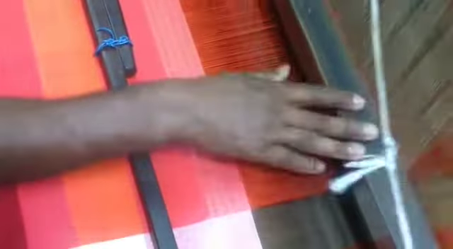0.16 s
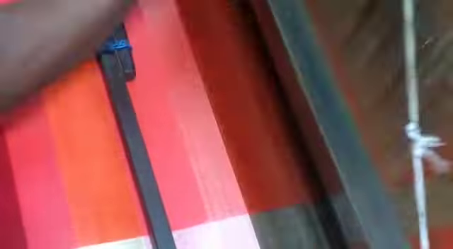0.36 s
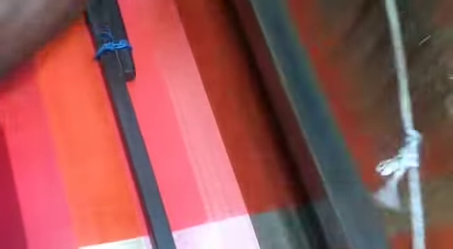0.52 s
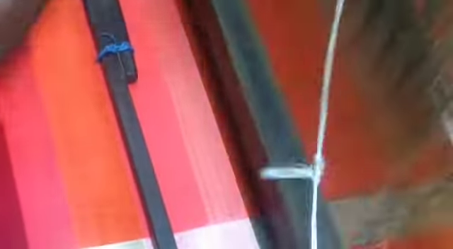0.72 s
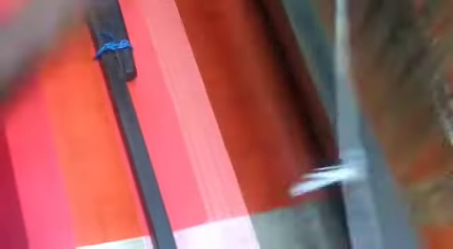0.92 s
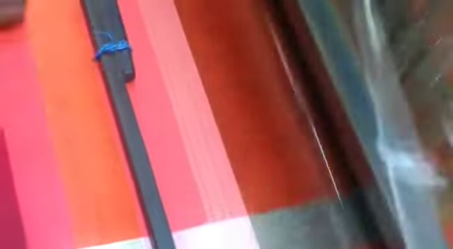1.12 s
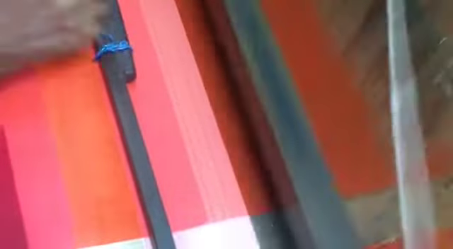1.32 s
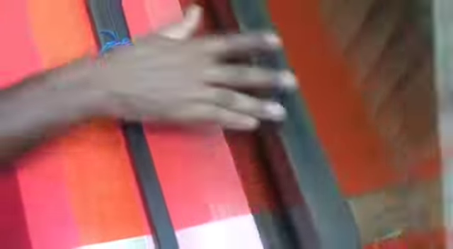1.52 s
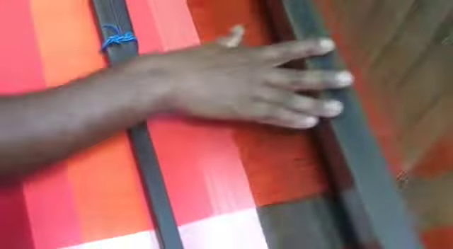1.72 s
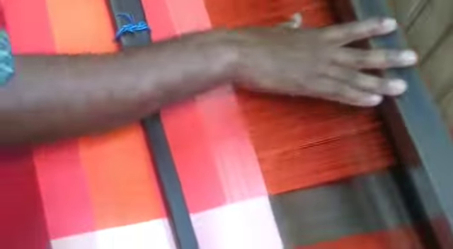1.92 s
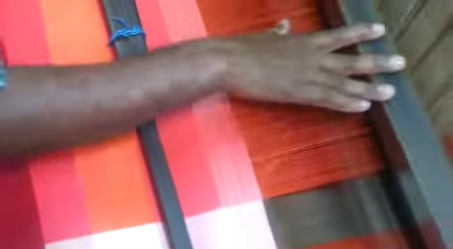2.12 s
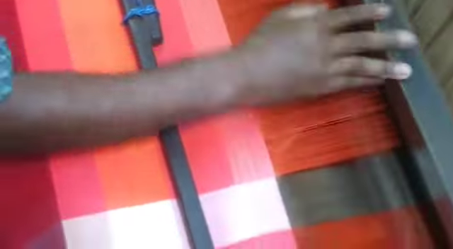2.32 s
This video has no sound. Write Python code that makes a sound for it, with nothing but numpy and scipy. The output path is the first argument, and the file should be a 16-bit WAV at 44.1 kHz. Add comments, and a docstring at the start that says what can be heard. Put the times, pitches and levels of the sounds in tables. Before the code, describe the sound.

A wooden handloom works close by. A dry, hissing reed scrape with faint squeaks swells from 0.1 s to a hard double clack near 0.4 s. Woody knocks rattle around 0.6, 1.0 and 1.25 s. A very brief scrape meets another clack at 1.5 s; a rough, uneven, squeaky scrape runs from 1.65 to 2.1 s, then faint ticks. Soft air noise, short room echo, wide phone-like pickup.

```python
"""Wooden handloom in a workshop.

Beater and shuttle knock in loose clusters: bursts of contacts ring frame modes under a dry crack.
The reed scrapes the warp in three strokes, the second brief: noise slips hiss and rumble, narrow noise squeaks.
Steady air noise and a sparse-tap room lie around them. A phone-like recorder widens the sound.
"""
import sys
import numpy as np
from scipy import signal
from scipy.fft import rfft, irfft
from scipy.io import wavfile
from scipy.ndimage import uniform_filter1d

SR = 44100
rng = np.random.default_rng(int(sys.argv[2]) if len(sys.argv) > 2 else 0)


def unload_wav(signal):
    """Save mono or channel-first audio to the path in sys.argv[1] as 16-bit WAV at rate SR, clipped to [-1, 1]."""
    wavfile.write(
        sys.argv[1],
        SR,
        np.round(np.clip(np.atleast_2d(signal).T, -1, 1) * 32767).astype(np.int16),
    )


N = 103635

# Air noise spectrum. Each row: frequency in Hz, relative level in dB.
AIR_SPECTRUM = [(24, -24), (40, -10.5), (135, -8.5), (239, -8.5), (355, -15.5), (693, -24), (1260, -20),
                (1690, -22.5), (3930, -27.5), (15000, -41)]
AIR_DB = -71

# Strokes of the reed along the warp, a list of points each.
# Each point: time in seconds, hiss level in dB, wooden rumble in dB over the hiss.
SCRAPE_STROKES = [
    [(0.05, -106, -12), (0.066, -74.5, -9), (0.09, -79, -2), (0.118, -61, -8), (0.134, -63, -9),
     (0.154, -55.5, -8), (0.178, -61, 0), (0.308, -42.5, -14.5), (0.4, -44, -9), (0.408, -51, -7),
     (0.5, -79, 12.5)],
    [(1.38, -116, -15), (1.418, -73.5, -3), (1.464, -81, -15), (1.49, -56, -5)],
    [(1.63, -71.5, -4), (1.67, -53, -9), (1.688, -56, -9), (1.706, -44.5, -16.5), (1.74, -53.5, -10),
     (1.802, -43.5, -12), (1.9, -51, -7), (1.92, -54, -4), (1.996, -55.5, -6), (2.004, -70, -13),
     (2.023, -59, -5), (2.029, -53, -20), (2.049, -57, -8), (2.055, -50, -12.5), (2.088, -55, -8),
     (2.11, -68, -5), (2.142, -73.5, -10), (2.152, -77, 1), (2.202, -74, -18), (2.252, -113, -12),
     (2.262, -70.5, -8), (2.29, -110.5, -8), (2.35, -80, -1)],
]
# Hiss spectrum. Each row: frequency in Hz, relative density in dB per Hz.
HISS_SPECTRUM = [(800, -19.5), (1400, -2.5), (2200, 2.5), (3000, -3.5), (4400, 1.5), (6200, -1.5),
                 (8000, -7), (11000, -11), (13500, -16), (15000, -29)]
# Rumble spectrum of the shaken beater. Each row: frequency in Hz, relative density in dB per Hz.
RUMBLE_SPECTRUM = [(60, -31), (150, -12), (300, -8), (550, 4), (1200, 2.5), (1800, -4), (3000, -45)]
SLIPS_PER_S, SLIP_SPREAD_DB, PATCHY_DB = 1700, 1.5, 3.5

# Room decay. Each row: frequency in Hz, 60 dB decay time in seconds.
ROOM_DECAY = [(150, 0.56), (500, 0.92), (1500, 0.26), (4000, 0.29), (10000, 0.49)]
KNOCK_SEND_DB, SCRAPE_SEND_DB = -17, -13

# Short squeaks of the reed.
# Each row: start in seconds, fade time to 1/e in seconds, frequency in Hz, level before the fade in dB.
SQUEAKS = [(0.113, 0.009, 4360, -57), (0.148, 0.0087, 6360, -57.5), (0.186, 0.026, 4580, -60),
           (0.256, 0.045, 7560, -53.5), (0.322, 0.019, 8700, -53), (2.34, 0.0072, 4800, -66),
           (1.694, 0.037, 4770, -56), (1.76, 0.03, 8340, -55), (1.859, 0.028, 6250, -46.5),
           (1.985, 0.015, 6250, -52.5), (2.05, 0.016, 9160, -59), (2.135, 0.0048, 6200, -53.5),
           (2.136, 0.0031, 8300, -60), (1.945, 0.011, 6200, -50.5)]
SQUEAK_WIDTH_HZ, SQUEAK_RISE_S = 120, 0.0027

# Knocks of wood on wood. Each row: start in seconds, level in dB, tilt in dB for bass, 460 Hz, 700 Hz,
# 1250 Hz and treble, chatter rise in seconds, chatter fall in seconds.
KNOCKS = [(.114, -80, -24, -1, -5, 1, 11, 0.00053, 0.039),
          (0.3807, -57, 3, 18, 7.5, 10, 7.5, 0.0016, 0.015), (.397, -57, 8.5, -1, -3, 4, 7, 0.0036, 0.042),
          (0.578, -64, 8.5, 10, 6, 2, 0, 0.001, 0.041),
          (0.639, -60, 10.5, 8.5, 11.5, 1, 4.5, 0.0043, 0.037),
          (.655, -57.5, -18, -5.5, -15, 3.5, -13, 0.00107, 0.011),
          (.672, -64.5, 11.5, 5, 3, -3, -0.5, 0.0088, 0.03), (0.977, -75, -15, 17, 15, 6, -3, 0.002, 0.031),
          (0.986, -72, -28, -31, 7, 7.5, 4.5, 0.003, 0.019), (1.001, -69, -5, 6, 11, -1, 0, 0.0087, 0.0099),
          (1.011, -58, 4.5, 0, 7, -5, -1.5, 0.008, 0.026),
          (1.0359, -61, -11, -2.5, -4, 2.5, 1.5, 0.00073, 0.0043),
          (1.040, -61.5, 4, 13, -3, -3, 8.5, 0.0036, 0.02),
          (1.061, -62, -14, 19.5, 17, 10, 6.5, 0.005, 0.08),
          (1.228, -77.5, -16, 19, 18, 17, 10, 0.001, 0.024),
          (1.256, -72, -9, 5.5, -15, -13, -3, 0.008, 0.0023),
          (1.264, -61, -4.5, -17, 3, -0.5, 10, 0.002, 0.0086),
          (1.271, -61.5, -7, -1, 3.5, -9, 10.5, 0.00096, 0.02),
          (1.279, -62, -28, 3, 7.5, 5.5, -5, .0015, 0.027), (1.303, -72.5, -24, 9, 9, 2, -11, 0.004, 0.028),
          (1.483, -63, 14, 9.5, 12, 7.5, 5.5, 0.0026, 0.04),
          (1.5016, -62, 0, -11.5, -2, 2.5, -10.5, 0.0013, 0.0044),
          (1.510, -63.5, 3.5, 5.5, 7, 2.5, 1.5, 0.0021, 0.037),
          (1.539, -78.5, -5, -14, -5, -7, 4, 0.0043, 0.015),
          (1.624, -73, -16, -11, -2, 2.5, -13.5, 0.0011, 0.012),
          (1.861, -66.5, -13, -18, 2, -12, 6, 0.00043, 0.014),
          (2.174, -81, -5, -7, -11, -7, -7, 0.0014, 0.014),
          (2.198, -82.5, 2, 0, 0.5, -4, -1, 0.00067, 0.022),
          (2.259, -85, -1, -14, -10, -18, -8, 0.0014, 0.024)]
# Modes of the wooden frame. Each row: frequency in Hz, level before the tilt in dB, 60 dB decay in seconds.
FRAME_MODES = [(135, -4.5, 0.099), (214, 5, 0.016), (443, -1.5, 0.077), (492.8, -1, 0.097), (691, -2, 0.12),
               (877, 2.5, 0.092), (1038, 1, 0.13), (1230, 3, 0.071), (1382, 6, 0.077), (1830, 16, 0.014),
               (2102, 16.5, 0.02), (2448, 9, 0.024), (2690, 3.5, 0.008), (2910, -4, 0.0068)]
# Dry crack of each contact, before the tilt. Each row: frequency in Hz, relative level in dB.
CRACK_SPECTRUM = [(100, -28.5), (500, 7), (1500, 11), (2600, 9.5), (6000, 0), (9000, -9), (15000, -27)]
CRACK_OVER_RING_DB = -1
CHATTER_PER_S, BLOW_GAIN = 12000, 4.4
SOFT_S = 0.0072  # the slower the rise, the softer the blow
DETUNE_RATIO, SPOT_DB = 0.012, 2.5  # spread of mode frequency and level between knocks
BODY_HZ, KNEE_HZ, TREBLE_HZ, DEEP_DB, DULL_DB = 1950, 3020, 4000, -18, -3.5

# Stereo likeness ahead of the recorder. Each row: frequency in Hz, left-right likeness from 0 to 1.
LIKENESS = [(30, 0.27), (125, 0.7), (500, 0.71), (2000, .92), (6000, 0.82), (8000, 0.3), (12000, 0.25)]
SCATTER_RAD = 1.8
MIC_HZ, WIDEN_S, EDGE_HZ = 28.7, 0.0005701, 15100


def gain_of(db):
    """Amplitude ratio of a level in dB."""
    return 10 ** (np.asarray(db) / 20)


def evened(x):
    """Scales x to unit RMS."""
    return x / np.sqrt(np.mean(x ** 2) + 1e-20)


def read(points, hz):
    """Interpolates a table over log frequency."""
    f, value = np.transpose(points)
    return np.interp(np.log(hz + 1), np.log(f + 1), value)


def add(mix, start_s, sound):
    """Adds a sound in place, cut at the end of the mix."""
    part = mix[round(start_s * SR):][:len(sound)]
    part += sound[:len(part)]


def coloured(x, points):
    """Filters x by a spectrum in dB, zero phase."""
    hz = np.fft.rfftfreq(x.shape[-1], 1 / SR)
    return irfft(rfft(x) * gain_of(read(points, hz)), x.shape[-1])


def struck(x, points):
    """Filters x by a spectrum in dB, minimum phase: nothing sounds ahead of the blow."""
    hz = np.fft.rfftfreq(len(x), 1 / SR)
    cepstrum = irfft(np.log(gain_of(read(points, hz))), len(x))
    half = len(x) // 2
    cepstrum = cepstrum * np.r_[1, np.full(half - 1, 2), 1, np.zeros(half - 1)]
    return irfft(rfft(x) * np.exp(rfft(cepstrum)), len(x))


def air():
    """Steady two-channel noise with the air spectrum."""
    return gain_of(AIR_DB) * evened(coloured(rng.standard_normal((2, N)), AIR_SPECTRUM))


def scrape():
    """Dense uneven slips of thread on the reed hiss and shake the beater, in drifting patches of colour."""
    t = np.arange(N) / SR
    slip_gain = gain_of(SLIP_SPREAD_DB * np.minimum(rng.exponential(1, N), 3))
    slipping = rng.random(N) < SLIPS_PER_S / SR
    slips = rng.standard_normal(N) * (0.5 + slip_gain * slipping)

    z = signal.stft(slips, nperseg=256)[2]
    patches = rng.standard_normal(z.shape)
    patches = uniform_filter1d(patches, size=4, axis=0)  # over frequency
    patches = evened(uniform_filter1d(patches, size=6, axis=1))  # over time
    slips = signal.istft(z * gain_of(PATCHY_DB * patches), nperseg=256)[1][:N]

    hiss = evened(coloured(slips, HISS_SPECTRUM))
    rumble = evened(coloured(slips, RUMBLE_SPECTRUM))
    out = np.zeros(N)
    for stroke in SCRAPE_STROKES:
        time_s, hiss_db, rumble_db = np.transpose(stroke)
        level = gain_of(np.interp(t, time_s, hiss_db, -120, -120))
        out += level * (hiss + gain_of(np.interp(t, time_s, rumble_db)) * rumble)
    return out


def room(x):
    """Two tails of sparse random-sign taps, each band dying at its own speed."""
    taps = np.zeros((2, SR // 2))
    slots = np.arange(120, SR // 2 - 20, 20)
    at = slots + rng.integers(0, 20, (2, len(slots)))
    np.put_along_axis(taps, at, rng.choice([-1., 1.], (2, len(slots))), 1)
    hz, t, z = signal.stft(taps, SR, nperseg=256)
    decay_db = -60 * t / read(ROOM_DECAY, hz)[:, None]
    tail = signal.istft(z * gain_of(decay_db), SR, nperseg=256)[1]
    return signal.fftconvolve(x[None], tail / np.linalg.norm(tail[0]), axes=1)[:, :N]


def squeak(length_s, hz, db):
    """Narrow fuzzy whistle: resonated noise moved up to hz, with a fast start and a fade."""
    t = np.arange(0, 2 * length_s, 1 / SR)
    pole = np.exp(-np.pi * SQUEAK_WIDTH_HZ / SR)
    noise = rng.standard_normal(4096) + 1j * rng.standard_normal(4096)
    waver = signal.lfilter([1], [1, -pole], noise)[-len(t):]
    whistle = evened((waver * np.exp(2j * np.pi * hz * t)).real)
    envelope = np.minimum(t / SQUEAK_RISE_S, 1) * np.exp(-(t / length_s) ** 2)
    return gain_of(db) * whistle * envelope


def knock(db, bass_db, chest_db, low_db, mid_db, treble_db, rise_s, fall_s):
    """One firm blow amid a burst of small contacts rings the frame, with a dry crack on each contact."""
    t = np.arange(8192) / SR
    chatter, timing, spread = rng.standard_normal((3, len(t)))
    peak_s = max(rise_s, 0.0003)
    fall = np.exp(-np.maximum(t - rise_s, 0) / max(fall_s, 0.001))
    shape = np.minimum(t / peak_s, 1) ** 2 * fall
    contact = abs(timing) < 1.25 * CHATTER_PER_S / SR  # 1.25: normal draws to about that rate
    hits = shape * chatter * (0.1 + contact)
    hits = hits + BLOW_GAIN * np.exp(-rise_s / SOFT_S) * np.sinc((t - peak_s) * SR)

    hz, mode_db, t60_s = np.transpose(FRAME_MODES)[:, :, None]
    spot, shift = spread[:2 * len(FRAME_MODES)].reshape(2, -1, 1)
    mode_gain = gain_of(mode_db + SPOT_DB * spot - 60 * t / t60_s)
    modes = mode_gain * np.sin(2 * np.pi * hz * (1 + DETUNE_RATIO * shift) * t)
    ring = signal.fftconvolve(hits, modes.sum(0))[:len(t)]
    crack = struck(hits, CRACK_SPECTRUM)
    sound = evened(ring) + gain_of(CRACK_OVER_RING_DB) * evened(crack)

    tilt = [(50, bass_db + DEEP_DB), (310, bass_db), (420, chest_db), (500, chest_db),
            (700, low_db), (1250, mid_db), (BODY_HZ, 0), (KNEE_HZ, 0),
            (TREBLE_HZ, treble_db), (14000, treble_db + DULL_DB)]
    # level holds for the energy packed into rise + fall
    return gain_of(db) * evened(struck(sound, tilt)) * np.sqrt(t[-1] / (rise_s + fall_s))


def paired(a, b):
    """Both channels share a, as alike as LIKENESS; b is phase-scattered and opposite in sign."""
    same = np.clip(read(LIKENESS, np.fft.rfftfreq(N, 1 / SR)), 0, 1)
    drift = uniform_filter1d(rng.standard_normal(len(same)), size=250)
    drift = evened(uniform_filter1d(drift, size=250))
    shared = rfft(a) * np.sqrt((1 + same) / 2)
    own = rfft(b) * np.sqrt((1 - same) / 2) * np.exp(1j * SCATTER_RAD * drift)
    return irfft(np.array([shared + own, shared - own]), N)


def scene():
    """Sums air, reed, squeaks, knocks and room into two channels."""
    reed = np.array([scrape(), scrape()])
    squeaks, blows = np.zeros(N), np.zeros(N)
    for start_s, *settings in SQUEAKS:
        add(squeaks, start_s, squeak(*settings))
    for start_s, *settings in KNOCKS:
        add(blows, start_s, knock(*settings))
    wet = room(gain_of(KNOCK_SEND_DB) * blows + gain_of(SCRAPE_SEND_DB) * (reed[0] + squeaks))
    a, b = blows + squeaks + reed + wet + air()
    return paired(a, b)


def record(dry):
    """Widener delays and inverts the left channel above 1 / (2 WIDEN_S) Hz; bass cut; band limit."""
    turn_rad = np.maximum(2 * np.pi * np.fft.rfftfreq(N, 1 / SR) * WIDEN_S - np.pi, 0)
    left = irfft(rfft(dry[0]) * np.exp(-1j * turn_rad), N)
    wide = np.array([left, dry[1]])
    wide = signal.sosfilt(signal.butter(2, MIC_HZ, "high", fs=SR, output="sos"), wide)
    band_limit = signal.firwin(511, EDGE_HZ, window=("kaiser", 9), fs=SR)
    return signal.oaconvolve(wide, band_limit[None], "same")


dry = scene()
out = record(dry)
unload_wav(out)
```